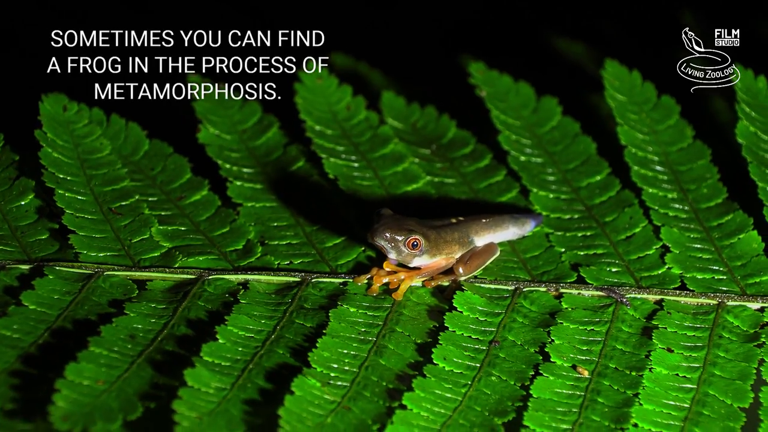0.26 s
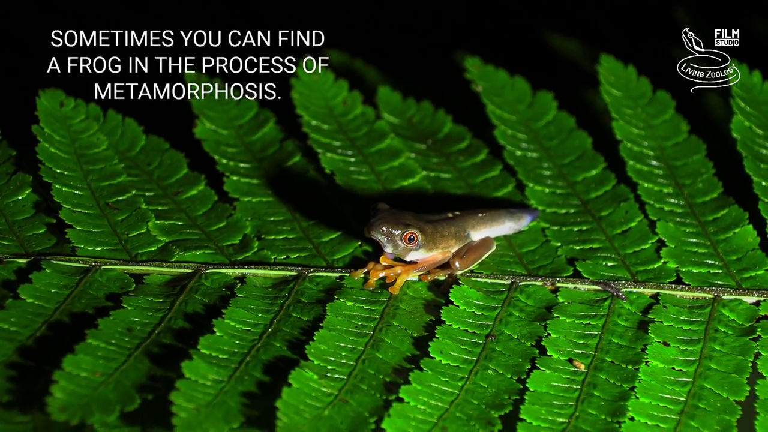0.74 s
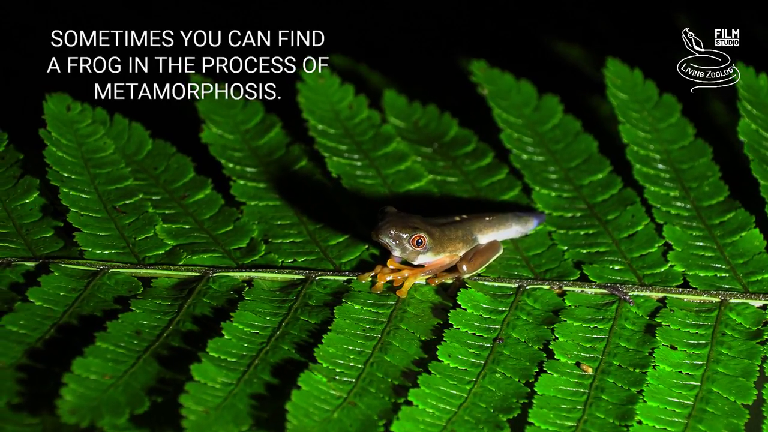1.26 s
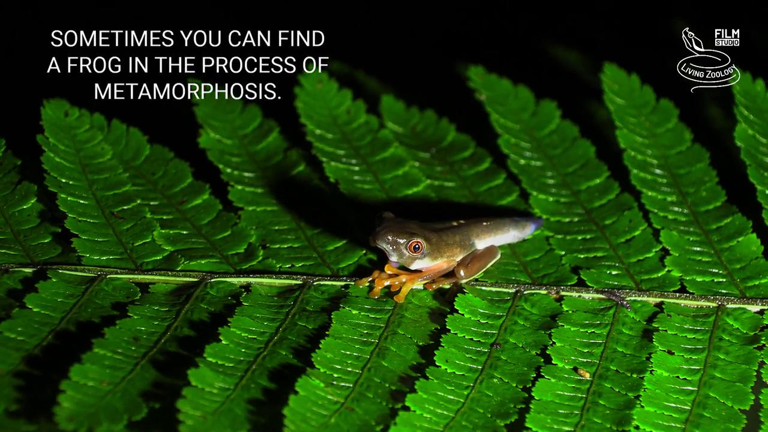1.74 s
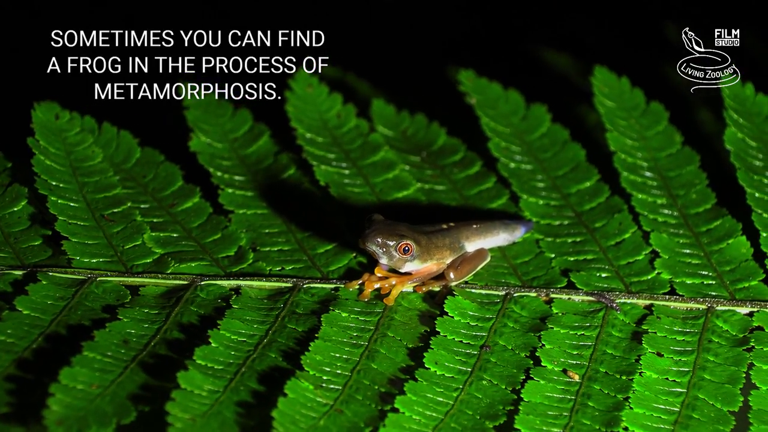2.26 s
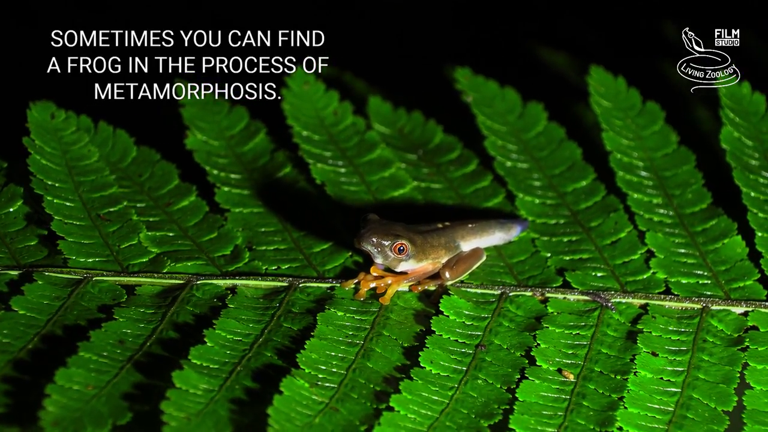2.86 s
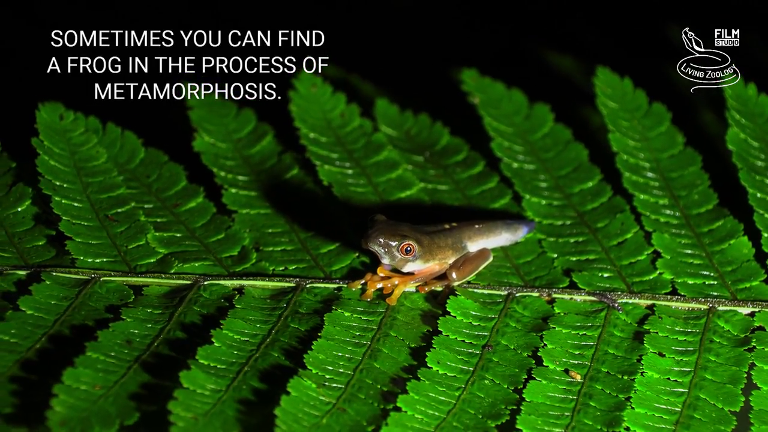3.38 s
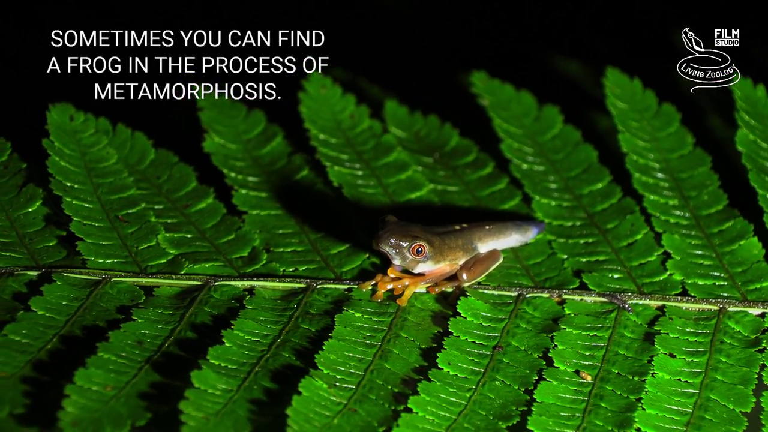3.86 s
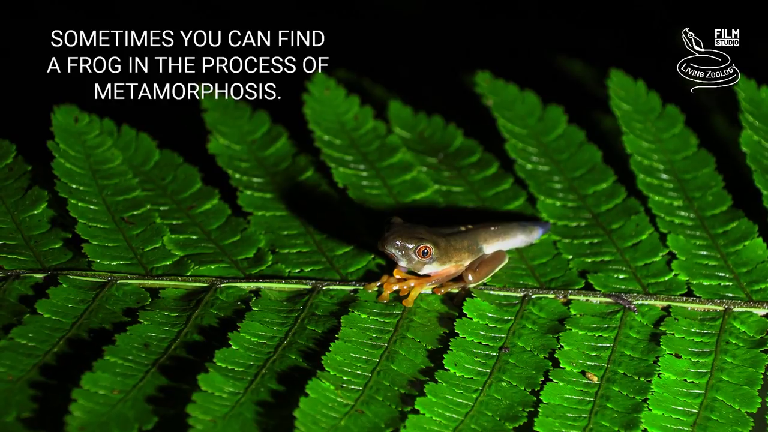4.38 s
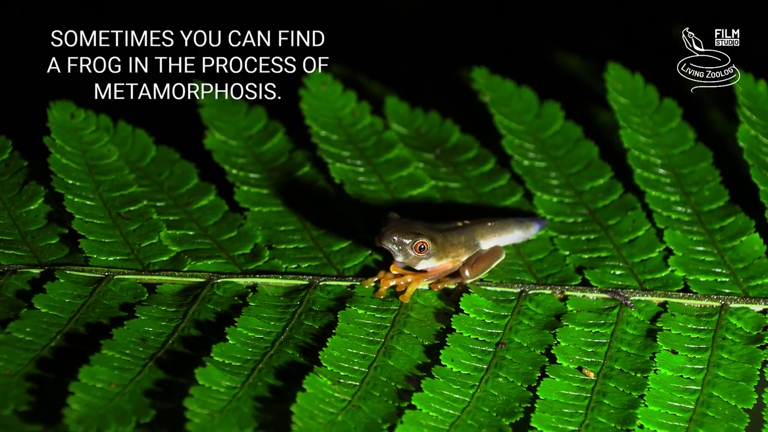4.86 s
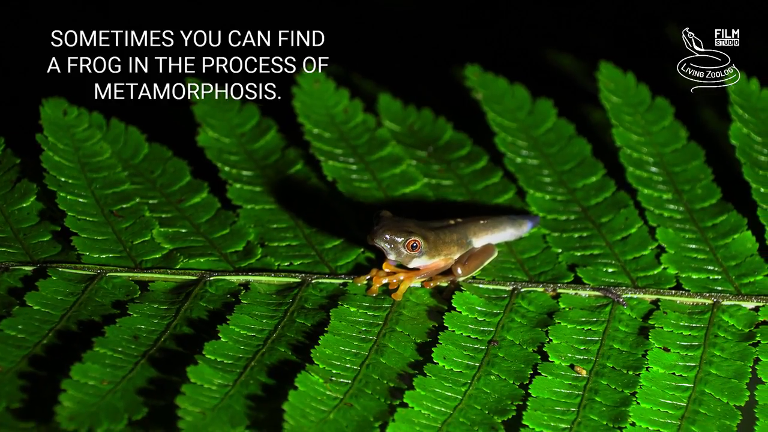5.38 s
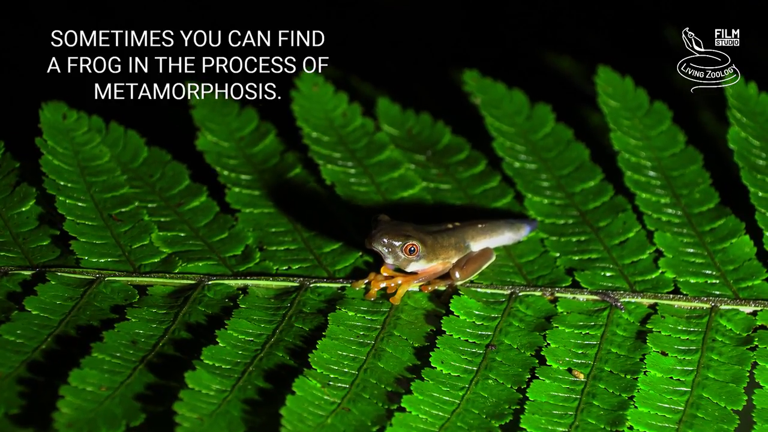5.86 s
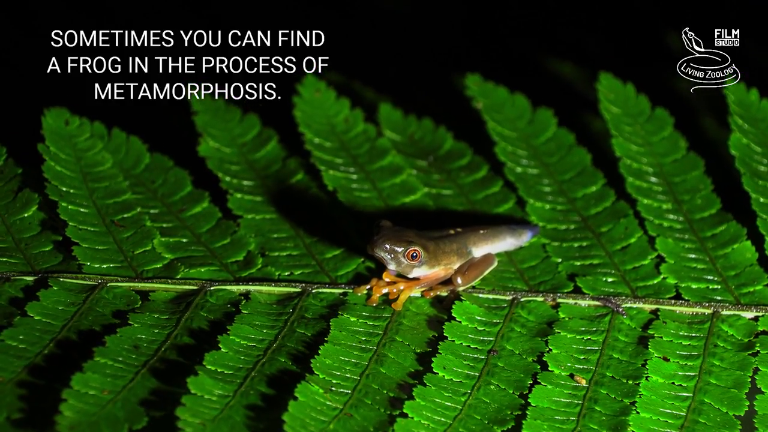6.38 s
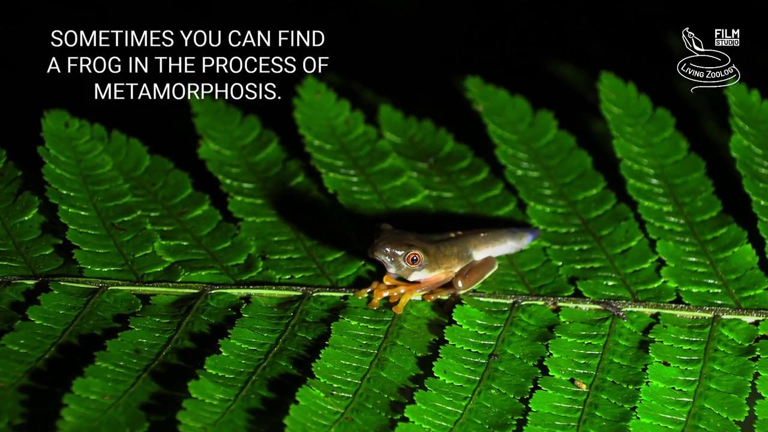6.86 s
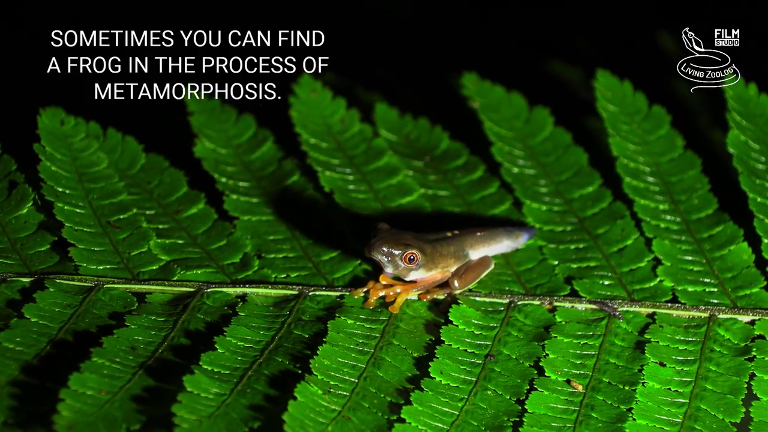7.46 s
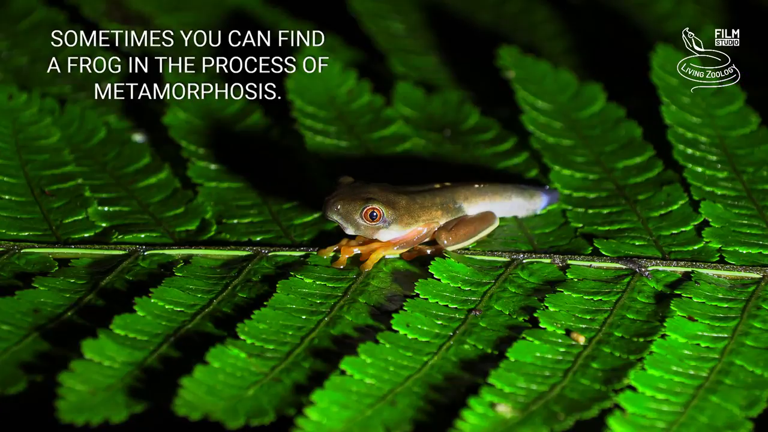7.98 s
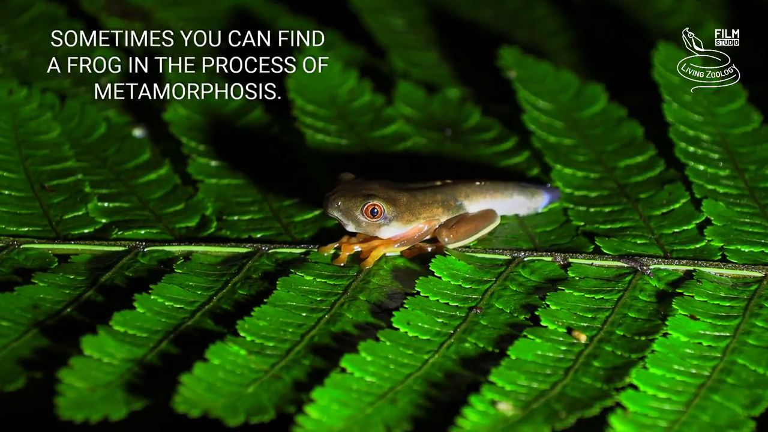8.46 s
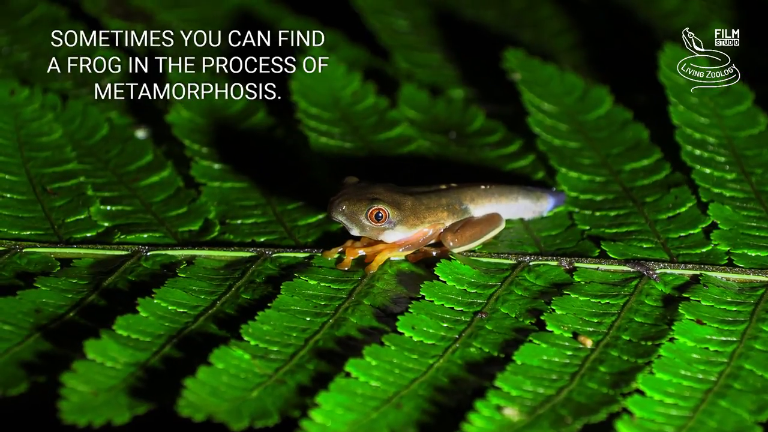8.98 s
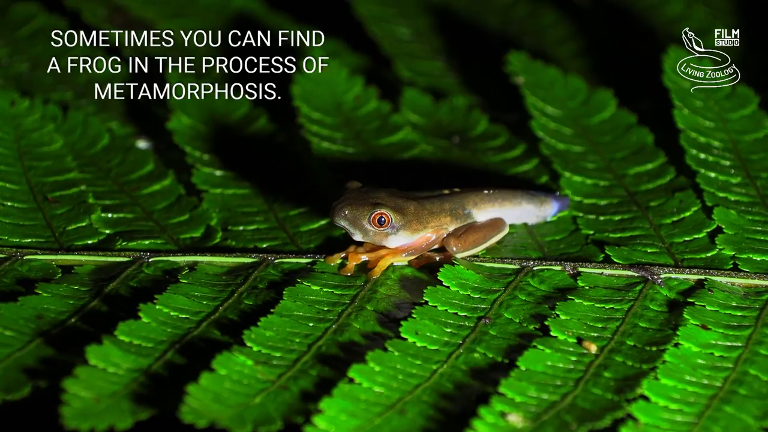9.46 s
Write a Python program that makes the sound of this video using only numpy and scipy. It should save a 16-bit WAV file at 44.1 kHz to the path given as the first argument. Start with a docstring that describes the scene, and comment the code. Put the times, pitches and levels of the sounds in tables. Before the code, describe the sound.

A night rainforest, continuous throughout: a narrow, shimmering high insect band around 6 to 7 kHz, a faint low rumble and soft hiss. A buzzing cricket trills in bouts until about 4.6 s; a slightly higher one joins from 1.2 s and carries on to the end. Distant reverberant chirps fall quickly in pitch from 0 to 3.7 s, with a few slower sinking notes near the end of that span. At 0.45 s two tiny upsweeps lead into one arched cry, rising then falling until 1 s, echoing from far trunks. From 1.8 to 7.3 s, dry frog click bursts recur about every 0.75 s, swelling to a snap, then fading. Very faint rapid pips occur near 4, 5 and 6 s. Close bright whistles start at 6.9, 7.6, 8.2, 8.8 and 9.4 s, each breaking lower, then sliding sharply down. A barely audible low hoot sits near 8.5 s.

```python
"""Night in a rainforest: first a near cricket over a far insect chorus and low rumble, with distant falling chirps.
A second cricket joins in, and an animal gives one arched cry. Frog clicks come in bursts, then faint pips.
Five close whistles, each breaking to a lower note and sliding down, come near the end.
Insects and rumble are shaped noise, calls are gliding sine waves, and clicks are short dying rings.
Trunks and leaves add echoes to the crickets, the frogs and the calls."""
import sys
import numpy as np
from scipy import signal
from scipy.fft import rfft, irfft
from scipy.io import wavfile
from scipy.ndimage import uniform_filter1d

SR = 44100
rng = np.random.default_rng(int(sys.argv[2]) if len(sys.argv) > 2 else 0)


def dump(signal):
    """Clip the signal to [-1, 1] and save it as 16-bit WAV at the path in sys.argv[1]."""
    limited = np.clip(np.atleast_2d(signal).T, -1, 1)
    pcm = np.round(limited * 32767).astype(np.int16)
    wavfile.write(sys.argv[1], SR, pcm)


N = 429093
T = np.arange(N) / SR  # time of every sample, s

# times that bound the crickets' bouts: each bout runs from one time to a rest before the next listed time;
# a step back in time gives no bout, and bouts that overlap add up: (t/s)
LOW_BOUTS = [.1, .73, 1.19, 1.89, 2.56, 3.6, 4.3, 4.74]
HIGH_BOUTS = [-1.7, 1.2, 1.5, -1.2, -1, 4, 2, 3.5, 4, 5, 6, 5, 3.5, 6.5, 9, 8.5, 5.5, 9.9]
REST_S = 0.106

# colour of the far insect chorus, relative: (f/Hz, level/dB)
CHORUS_COLOUR = [(4500, -32), (5400, -17), (5900, -5.5), (6250, 0.5), (6650, 1), (7000, -4), (7500, -12.5),
                 (8000, -24.5), (8500, -44), (11000, -41), (12500, -33), (13300, -37), (14000, -40)]
# far hoarse rasps: (loudest at t/s, length t/s, level/dB)
RASPS = [(.05, 1, -56), (1.3, 1, -68), (1.96, 0.29, -53), (3.435, 0.47, -58.5), (9.1, 0.2, -55.5),
         (9.53, 0.86, -61)]
SHRILL_HZ, SHRILL_WIDTH_HZ, SHRILL_DB = 7730, 340, -69  # a shrill group of far insects

# colour of the low rumble and its hiss, relative: (f/Hz, level/dB)
RUMBLE_COLOUR = [(20, -22), (36, -27), (50, -4.5), (70, -8), (100, 0), (200, 1.5), (300, -1), (500, -7),
                 (800, -12), (1300, -13), (2500, -16), (4500, -17.5), (9000, -31), (15500, -39)]
HOOT_HZ, HOOT_START_S, HOOT_END_S, HOOT_DB = 188, 8.15, 9.17, -60.5  # a faint low hoot
# colour of the faint noise that differs between left and right, relative: (f/Hz, level/dB)
SIDE_COLOUR = [(25, 20), (70, 25), (200, 13.5), (600, 11.5), (1500, 1), (6000, -9), (12000, 12.5),
               (15500, 10)]

# distant chirps, before throat and distance: (start t/s, length t/s, first pitch f/Hz, level/dB)
CHIRPS = [(-.02, .08, 4800, -48), (.12, .09, 3220, -47), (.245, .14, 4920, -46), (1.01, .15, 4850, -46),
          (1.27, .1, 3280, -46), (1.39, .16, 4980, -45), (1.65, .15, 4980, -46.5), (2.18, .21, 5120, -46),
          (2.48, .09, 3100, -51), (2.63, .17, 4920, -48), (2.92, .15, 4720, -47.5),
          (3.19, .12, 4680, -49.5), (3.43, .07, 2950, -53), (3.56, .1, 4750, -53)]
# distant notes that sink slowly, before throat and distance: (start t/s, length t/s, first pitch f/Hz, level/dB)
HELD_NOTES = [(2.73, .09, 3700, -55), (3.235, .12, 3740, -48), (3.565, .17, 3870, -50)]
CHIRP_FALL_HZ_PER_S, HELD_FALL_HZ_PER_S = 4300, 1000
# what throat and mouth pass in the whistles, chirps and upsweeps: (f/Hz, level/dB)
WHISTLE_THROAT = [(1000, -9), (2000, -14.5), (3000, -3), (4000, 1), (5200, -1), (6500, -3), (8500, -10.5),
                  (10000, -20), (11200, -38), (12700, -18), (15500, -40)]

# two far upsweeps just before the cry, before the throat: (start t/s, length t/s, from f/Hz, to f/Hz, level/dB)
UPSWEEPS = [(0.442, 0.048, 3020, 4740, -48.5), (0.476, 0.037, 2794, 5160, -39)]
# the arched cry, before harmonics and throat: (t/s, pitch f/Hz, level/dB)
CRY_PATH = [(.507, 1407, -39), (.527, 2090, -29.5), (.567, 2537, -33.5), (.64, 2563, -34.5),
            (.66, 2231, -28.5), (.735, 1933, -32.5), (.765, 1634, -34.5), (.84, 1364, -44.5),
            (.98, 1060, -50.5)]
# strength of the cry's multiples 1, 2, ..: (level/dB)
CRY_HARMONICS = [-0.5, -0.5, -13, -21.5, -29]
# what the wide-open throat of the crying animal passes: (f/Hz, level/dB)
CRY_THROAT = [(1000, -14.5), (2000, -22.5), (2600, -11.5), (3000, -2), (4000, 0.5), (5200, -2), (6000, -19),
              (7100, -12), (7700, 1.5), (8400, -6.5), (10400, -7), (12000, -5), (15500, -36)]
# far trunks and slopes that throw the cry back: (delay t/s, level/dB)
CRY_ECHOES = [(.075, -9), (.168, -9.5), (.285, -15.5), (.39, -21)]

# frog rattles, levels before filtering and scatter:
# (snap t/s, run-up length t/s, pause t/s, last run-up level/dB, snap level/dB, first closing level/dB)
RATTLES = [(1.7605, 0, 0.093, -44, -38, -41), (2.625, .03, .075, -42.5, -38.5, -40.5),
           (3.4515, .09, 0.052, -35.5, -34, -39), (4.2132, .13, 0.053, -36.5, -39, -42.5),
           (4.963, .13, .058, -37, -29.5, -42), (5.691, .09, .043, -34.5, -28.5, -41),
           (6.399, .12, .049, -36, -31.5, -40), (7.1642, .12, 0.041, -38.5, -33, -41.5)]
RUN_UP_GAP_S, RUN_UP_HZ, SWELL_DB_PER_S = .0212, 1690, 76
SNAP_HZ = 2030
CLOSING_GAP_S, CLOSING_HZ, FADE_DB_PER_S = .017, 1930, 91
RUN_UP_OVERTONE_DB, SNAP_OVERTONE_DB = -6, -11.5  # upper mode before the snap, and from the snap on
CLICK_SCATTER_S, CLICK_SCATTER_DB = .0005, 2.0  # typical chance shift of each click

# runs of pips from a far frog, before distance: (start t/s, end t/s, pitch f/Hz, level/dB)
PIP_RUNS = [(3.967, 4.4, 3310, -60), (5.002, 5.44, 3220, -63), (6.048, 6.38, 3330, -61)]

# close whistles, before throat and final trim:
# (start t/s, break t/s, drop t/s, settling t/s, pitch f/Hz, upper note level/dB)
WHISTLES = [(6.892, 7.013, 7.340, .045, 5350, -31.5), (7.590, 7.817, 7.944, .014, 5270, -35),
            (8.172, 8.380, 8.516, .014, 5190, -35), (8.787, 8.978, 9.132, .012, 5130, -34.5),
            (9.416, 9.557, 9.704, .009, 5040, -33.5)]
# strength of multiples 1, 2, .. in the whistled notes: (level/dB)
WHISTLE_HARMONICS = [0, -5.5, -2, -5]
# strength of multiples 1, 2, .. in the harsher closing slide: (level/dB)
SLIDE_HARMONICS = [-3, -2, -4, -9]
# one big trunk near the whistler: (delay t/s, level/dB)
WHISTLE_ECHOES = [(.033, -6)]
# the upper note starts too high by this ratio, then sags and tires; the break takes a moment
SCOOP, SAG_HZ_PER_S, TIRE_DB, BREAK_S = 1.08, 2400, -1.5, .014
# the lower note settles towards one pitch, then sinks to a share of the whistle's pitch
LOWER_HZ, LOWER_END, LOWER_DB = 4190, .775, -40
# the closing slide: length, final pitch ratio, level against the lower note
DROP_S, DROP_RATIO, DROP_DB = .072, .46, -5.5

TOP_HZ = 15700  # where the recorder cuts off


def undb(db):
    """Decibels to gain."""
    return 10 ** (np.asarray(db) / 20)


def level(x, db):
    """Scale to an rms level (a kind of average loudness)."""
    return x * undb(db) / np.sqrt(np.mean(x ** 2))


def response(points, hz):
    """Gain of a (Hz, dB) spectrum at the given frequencies."""
    f, db = np.transpose(points)
    return undb(np.interp(np.log(hz + 1), np.log(f), db))


def noise(points):
    """Random hiss of unit rms, coloured to the given spectrum."""
    spectrum = rfft(rng.standard_normal(N))
    coloured = spectrum * response(points, np.fft.rfftfreq(N, 1 / SR))
    return level(irfft(coloured, N), 0)


def walk(rate, size=N):
    """Smooth random wandering with a spread near 1; a higher rate (per second) wanders faster."""
    k = int(SR / rate)
    steps = np.repeat(rng.standard_normal(size // k + 1), k)
    return 1.3 * uniform_filter1d(uniform_filter1d(steps, k), k)[:size]


def resonate(x, hz, width_hz):
    """One resonance, gain 1 at its centre."""
    return signal.lfilter(*signal.iirpeak(hz, hz / width_hz, fs=SR), x)


def gate(start, end, attack_s, release_s):
    """Attack, hold and release between two times."""
    return np.clip(np.minimum((T - start) / attack_s, (end - T) / release_s), 0, 1)


def forest(x, early_db, early_s, late_db, t60, slaps=(), count=40):
    """Direct sound, echoes from near trunks, single slaps, and a tail from the leaves fading 60 dB in t60 s."""
    t = T[:2 * SR]
    trunks = np.zeros(len(t))
    lags = np.clip(.003 + rng.exponential(early_s, count), 0, 1)
    bounces = rng.choice([-1, 1], count) * np.exp(-.5 * lags / early_s)
    np.add.at(trunks, (lags * SR).astype(int), bounces)
    leaves = rng.standard_normal(len(t)) * undb(-60 * t / t60) * (1 - np.exp(-t / .015))
    echoes = undb(early_db) * trunks / np.linalg.norm(trunks)
    echoes += undb(late_db) * leaves / np.linalg.norm(leaves)
    for delay, db in slaps:
        echoes[int(delay * SR)] += undb(db)
    echoes = signal.lfilter(*signal.butter(2, 8500, fs=SR), echoes)  # foliage soaks up the top
    return x + signal.fftconvolve(x, echoes)[:N]


def voice(rows, harmonics, throat, waver, flutter_db=0):
    """A whistled call along (s, pitch Hz, dB) rows; its harmonics sweep through the throat resonance."""
    s, pitch, db = np.transpose(rows)
    out, span = np.zeros(N), slice(*np.searchsorted(T, [s[0], s[-1]]))
    t = T[span]
    tremor = uniform_filter1d(rng.standard_normal(len(t)), SR // 250) * np.sqrt(SR // 250)
    hz = np.interp(t, s, pitch) * (1 + waver * tremor)
    phase = 2 * np.pi * np.cumsum(hz) / SR
    tone = np.zeros(len(t))
    for k, part_db in enumerate(harmonics, 1):
        audible = k * hz < SR / 2  # leave out what the sample rate cannot hold
        tone += undb(part_db) * response(throat, k * hz) * audible * np.sin(k * phase)
    edges = np.clip(np.minimum(t - s[0], s[-1] - t) / .004, 0, 1)
    flutter = flutter_db * walk(90.2, size=len(t))  # uneven pressure beads the level
    out[span] = np.sqrt(2) * tone * edges * undb(np.interp(t, s, db) + flutter)
    return out


def cricket(bouts, stroke_hz, wing_hz, sag, duty, octave_db):
    """Each wing stroke draws the scraper over the file; the tone sags as the wing slows."""
    singing = sum(gate(start, following - REST_S, .009, 0.014) for start, following in zip(bouts, bouts[1:]))
    cycle = np.cumsum(stroke_hz * (1 + .002 * walk(10))) / SR % 1
    stroke = np.minimum(cycle / duty, 1)  # 0 to 1 through the stroke, then silent at 1
    hz = wing_hz * (1 - sag * stroke ** 3 + 0.00499 * walk(250))
    phase = 2 * np.pi * np.cumsum(hz) / SR
    tone = np.sin(phase) + undb(octave_db) * np.sin(2 * phase)
    return level(singing * np.sin(np.pi * stroke) * undb(0.71 * walk(50)) * tone, 0)


def far_insects():
    """Countless far singers merge into a shimmering band, with a shrill group above and swelling rasps below."""
    chorus = level(noise(CHORUS_COLOUR) * undb(.5 * walk(2.83) + 0.6 * walk(90)), -47.5)
    shrill = resonate(rng.standard_normal(N), SHRILL_HZ, SHRILL_WIDTH_HZ)
    shrill = resonate(shrill, SHRILL_HZ, SHRILL_WIDTH_HZ) * undb(2.5 * walk(6))
    rasp = resonate(rng.standard_normal(N), 3240, 1400)
    rasp = resonate(rasp, 3240, 1400) * undb(1.7 * walk(40))
    swells = sum(undb(db) * np.exp(-(2 * (T - s) / length) ** 2) for s, length, db in RASPS)
    return chorus + level(shrill, SHRILL_DB) + level(rasp, 0) * swells


def night_air():
    """A low distant rumble with faint hiss from shaped noise, and one soft hoot from a wavering sine."""
    swell = undb(.4 * walk(2))
    rumble = level(noise(RUMBLE_COLOUR) * swell, -55.0)
    hoot = np.sqrt(2) * np.sin(2 * np.pi * np.cumsum(HOOT_HZ * (1 + 0.006 * walk(12))) / SR)
    return rumble + undb(HOOT_DB) * hoot * gate(HOOT_START_S, HOOT_END_S, 0.29, 0.087)


def chirp(start, length, from_hz, to_hz, db, harmonics, waver):
    """A short gliding note that swells and fades."""
    rows = [(start, from_hz, db - 6),
            (start + .4 * length, (from_hz + to_hz) / 2, db + 1),
            (start + length, to_hz, db - 3)]
    return voice(rows, harmonics, WHISTLE_THROAT, waver)


def far_chirps():
    """Distant callers: every chirp falls at the same quick rate, every held note at the same slow one."""
    out = np.zeros(N)
    for notes, fall in ((CHIRPS, CHIRP_FALL_HZ_PER_S), (HELD_NOTES, HELD_FALL_HZ_PER_S)):
        for start, length, hz, db in notes:
            out += chirp(start, length, hz, hz - fall * length, db, harmonics=[0, -5, -3], waver=.028)
    return out


def arched_cry():
    """Two quick upsweeps, then a cry whose pitch rises and falls through a wide-open throat."""
    upsweeps = sum(chirp(*row, harmonics=[0], waver=0.024) for row in UPSWEEPS)
    return upsweeps + voice(CRY_PATH, CRY_HARMONICS, CRY_THROAT, waver=0.006, flutter_db=1.5)


def rattle_clicks(snap, run_up, pause, run_up_db, snap_db, closing_db, count=4):
    """One rattle as (s, dB, ring Hz, overtone dB): low clicks swell to a higher snap, quicker ones fade after."""
    rising = [(snap - RUN_UP_GAP_S - lead, run_up_db - SWELL_DB_PER_S * lead, RUN_UP_HZ, RUN_UP_OVERTONE_DB)
              for lead in np.arange(0, run_up - RUN_UP_GAP_S, RUN_UP_GAP_S)]
    closing = [(snap + pause + lag, closing_db - FADE_DB_PER_S * lag, CLOSING_HZ, SNAP_OVERTONE_DB)
               for lag in CLOSING_GAP_S * np.arange(count)]
    return rising + [(snap, snap_db, SNAP_HZ, SNAP_OVERTONE_DB)] + closing


def frog(ring_s, rise_s, upper_hz, sac_hz, sac_db, sac_s):
    """Each click rings the throat for a few cycles, with a weak mode above and the slower vocal sac below."""
    out, t = np.zeros(N), T[:SR // 25]
    sac = undb(sac_db) * np.sin(2 * np.pi * sac_hz * t) * np.exp(-t / sac_s)
    for row in RATTLES:
        scatter = rng.standard_normal(size=(16, 2))
        for (s, db, hz, upper_db), (late, louder) in zip(rattle_clicks(*row), scatter):
            upper = undb(upper_db) * np.sin(2 * np.pi * upper_hz * t)
            throat = (np.sin(2 * np.pi * hz * t) + upper) * np.exp(-t / ring_s)
            ring = (throat + sac) * (1 - np.exp(-t / rise_s)) ** 2
            i = int((s + CLICK_SCATTER_S * late) * SR)
            out[i:i + len(t)] += undb(db + CLICK_SCATTER_DB * louder) * ring / np.abs(ring).max()
    return signal.sosfilt(signal.butter(8, 1300, "high", fs=SR, output="sos"), out)


def pips(rate_hz, duty, sag):
    """A far frog pipes quick runs of short, slightly falling notes."""
    out = np.zeros(N)
    for start, end, hz, db in PIP_RUNS:
        span = (T >= start) & (T < end)
        note = np.minimum((T[span] - start) * rate_hz % 1 / duty, 1)  # silent once it reaches 1
        phase = 2 * np.pi * np.cumsum(hz * (1 + sag * (.5 - note))) / SR
        out[span] = undb(db) * np.sin(np.pi * note) * np.sin(phase)
    return out


def whistle(start, crack, drop, settle, hz, db):
    """The upper note, scooped from above, sags and breaks to the lower; then the pitch slides about an octave."""
    end_hz = hz - SAG_HZ_PER_S * (crack - start - settle)
    entry_hz = LOWER_HZ * (1 + 2 * settle)  # a slower voice scoops the lower note from higher up
    sunk_hz = hz * LOWER_END
    upper = [(start, hz * SCOOP, db - 10.5),
             (start + settle, hz, db),
             (crack - BREAK_S, end_hz, db + TIRE_DB),
             (crack, .96 * end_hz, db - 7)]
    lower = [(crack, entry_hz, LOWER_DB),
             (crack + settle, (entry_hz + LOWER_HZ) / 2, LOWER_DB),
             (drop - .025, sunk_hz, LOWER_DB - 3),
             (drop + .004, sunk_hz * .96, LOWER_DB - 6)]
    progress = np.linspace(0, 1, 12)
    slide = DROP_RATIO + (1 - DROP_RATIO) / (1 + np.exp((progress - .37) / .12))  # S-shaped fall
    fall = [(drop + DROP_S * p, sunk_hz * ratio, LOWER_DB + DROP_DB) for p, ratio in zip(progress, slide)]
    notes = sum(voice(rows, WHISTLE_HARMONICS, WHISTLE_THROAT, waver=.005, flutter_db=2.8)
                for rows in (upper, lower))
    return notes + voice(fall, SLIDE_HARMONICS, WHISTLE_THROAT, waver=.005)


def scene():
    """Each caller sits at its own depth in the forest; both channels hear nearly the same."""
    low = cricket(LOW_BOUTS, stroke_hz=60.74, wing_hz=6290, sag=.11, duty=.6, octave_db=-29.0)
    high = cricket(HIGH_BOUTS, stroke_hz=65.9, wing_hz=6733, sag=.085, duty=.6, octave_db=-35)
    both = undb(-52.5) * low + undb(-48.0) * high
    crickets = forest(both, early_db=-21.5, early_s=0.017, late_db=-10.5, t60=0.39)
    chirps = forest(undb(-12.5) * far_chirps(), early_db=8.5, early_s=.026, late_db=9.0, t60=0.87, count=120)
    cry = forest(arched_cry(), early_db=-1.5, early_s=.04, late_db=0, t60=1.4, slaps=CRY_ECHOES, count=150)
    clicks = frog(ring_s=0.0011, rise_s=0.0006, upper_hz=2894, sac_hz=1511, sac_db=-27, sac_s=0.016)
    rattle = forest(clicks, early_db=-6, early_s=0.016, late_db=-2.5, t60=0.65)
    far_pips = undb(-4) * pips(rate_hz=18.0, duty=.5, sag=.1)
    piping = forest(far_pips, early_db=0, early_s=.015, late_db=-2, t60=.7)
    near_notes = undb(-2.0) * sum(whistle(*row) for row in WHISTLES)
    whistles = forest(near_notes, early_db=-3.5, early_s=.028, late_db=-3, t60=0.82, slaps=WHISTLE_ECHOES)
    mono = crickets + far_insects() + night_air() + chirps + cry + rattle + piping + whistles
    side = level(noise(SIDE_COLOUR), -79)  # opposite in the two channels
    return np.array([mono + side, mono - side])


def record(dry):
    """The recorder cuts the top steeply."""
    return signal.sosfilt(signal.ellip(12, .1, 80, TOP_HZ, fs=SR, output="sos"), dry)


dry = scene()
out = record(dry)
dump(out)
```